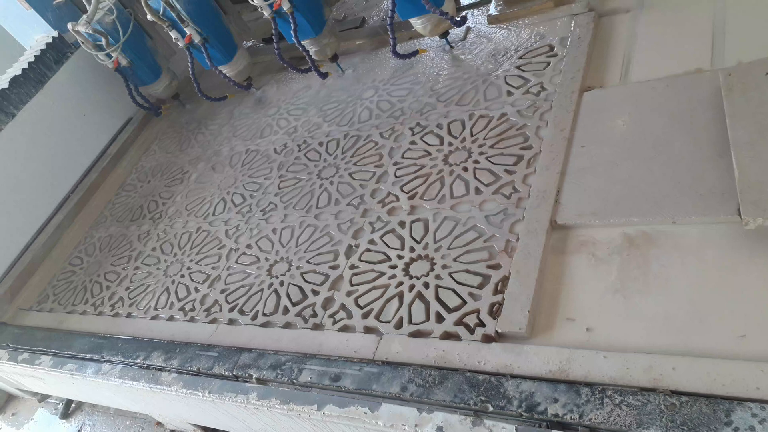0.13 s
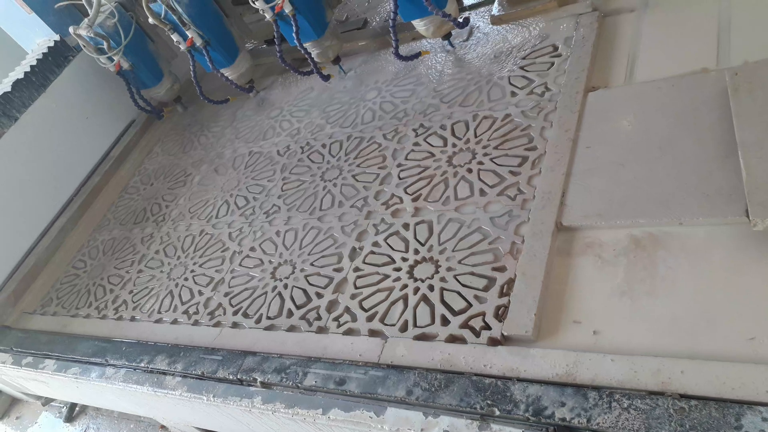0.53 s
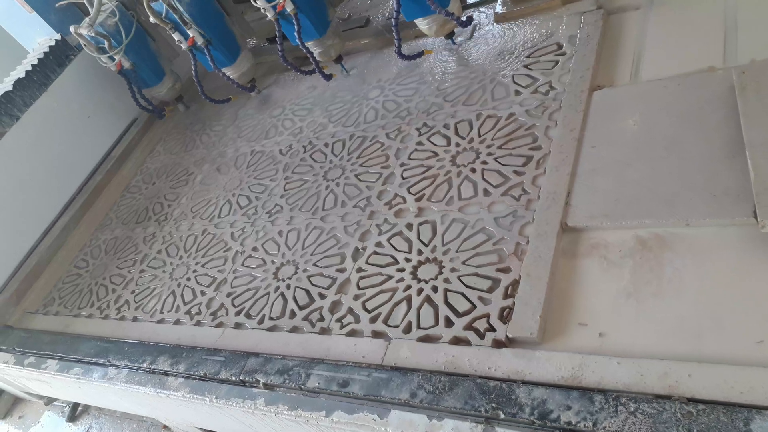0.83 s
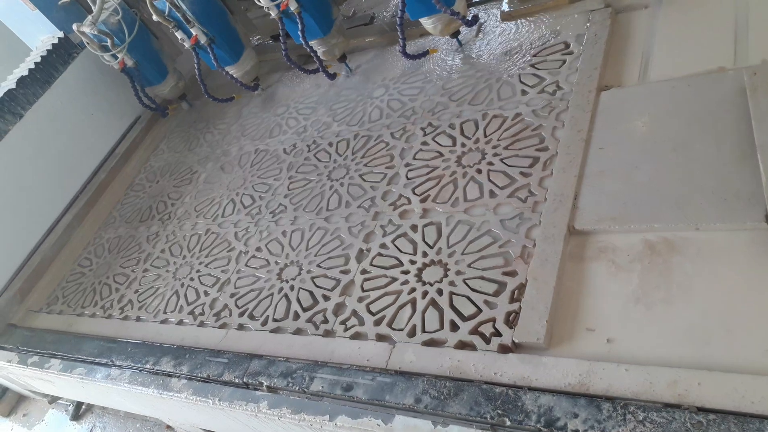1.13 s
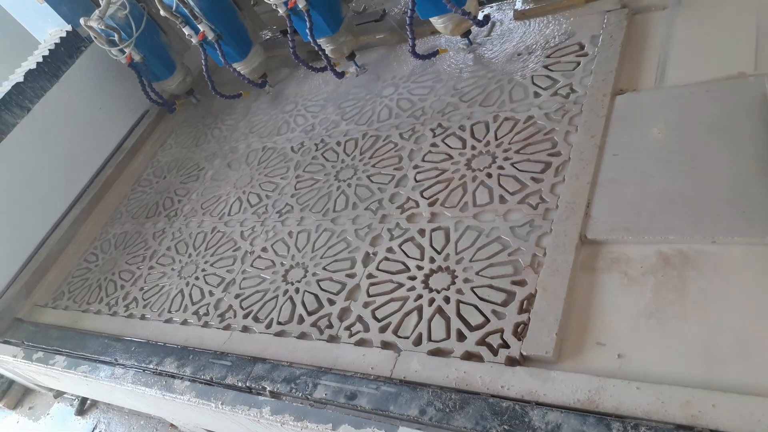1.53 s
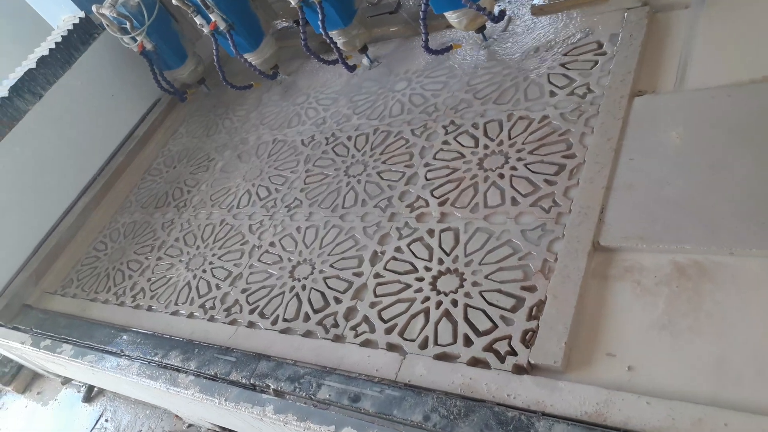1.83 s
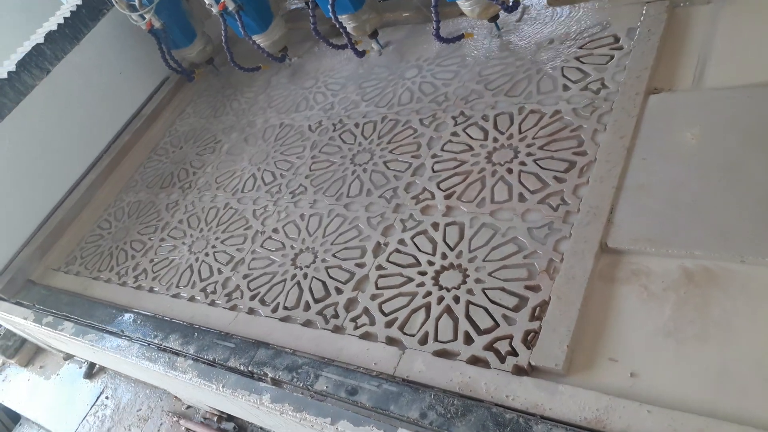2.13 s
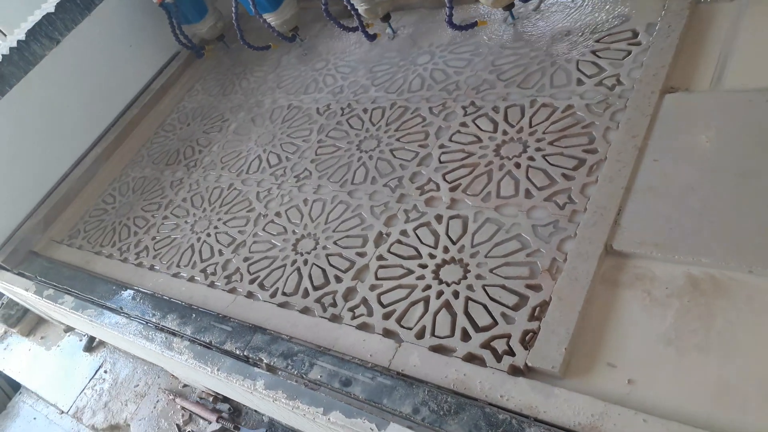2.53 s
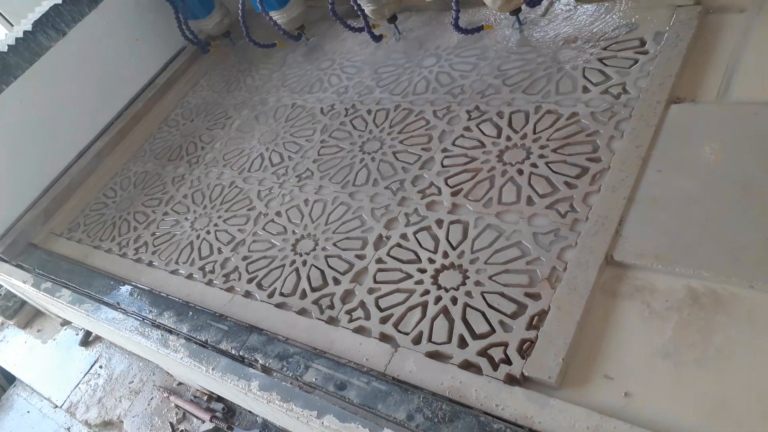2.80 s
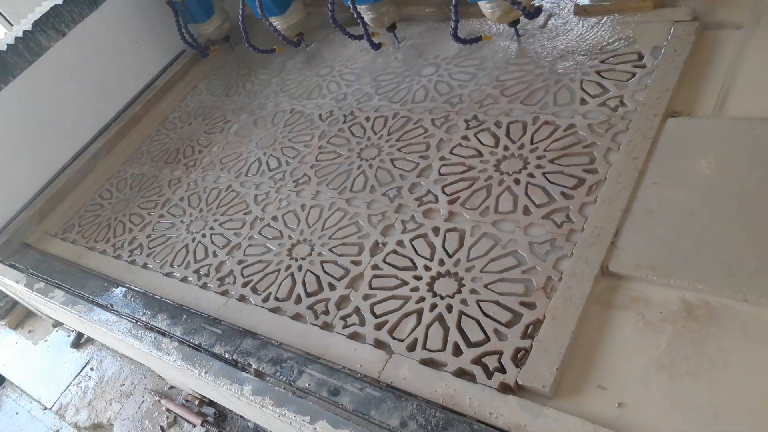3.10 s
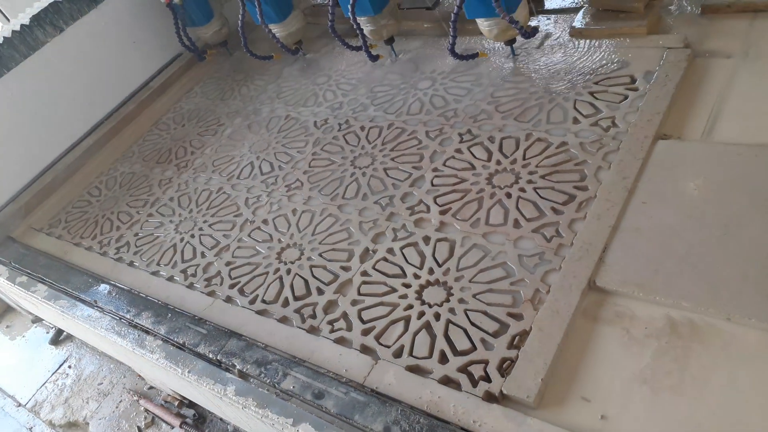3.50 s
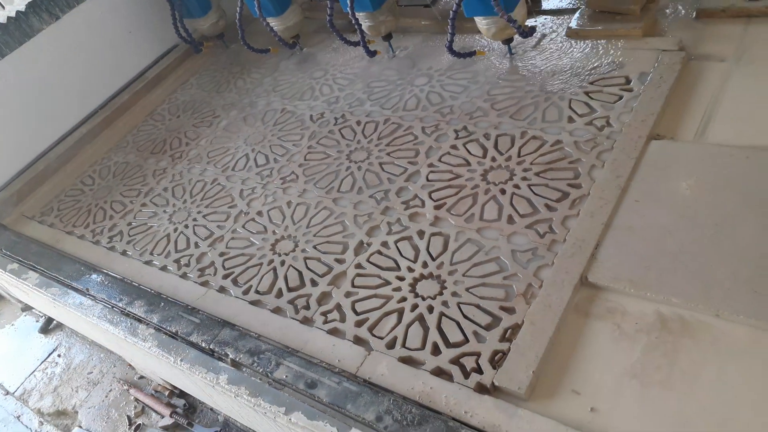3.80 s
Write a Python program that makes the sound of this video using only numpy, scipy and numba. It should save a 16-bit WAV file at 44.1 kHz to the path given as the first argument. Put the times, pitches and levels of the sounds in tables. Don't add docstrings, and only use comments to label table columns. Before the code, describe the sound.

Loud carving spindles grind patterned stone throughout, their buzz sagging slightly under load and easing near the end. Steady hum, shrill bearing whine and spray hiss surround them, heard close by phone in a reverberant workshop.

```python
import sys
import numpy as np
from scipy import signal
from scipy.fft import rfft, irfft
from scipy.io import wavfile
from scipy.ndimage import uniform_filter1d
from numba import njit

SR = 44100
rng = np.random.default_rng(int(sys.argv[2]) if len(sys.argv) > 2 else 0)


def output_pcm(signal):
    pcm = np.clip(np.atleast_2d(signal).T, -1, 1) * 32767
    wavfile.write(sys.argv[1], SR, np.round(pcm).astype(np.int16))


def attenuation_scalar(level_db):
    decades = np.asarray(level_db, float) / 20
    return 10 ** decades


N = 174195

# pitch_hz, level_db
HALL_COLOUR = [(20, -30), (45, -21), (90, -13), (130, -6.5), (300, 3.5), (580, 0), (1000, 3.5), (3000, -23)]
# start_s, pitch_hz, level_db
FEED_MOTOR = [
    (0, 64, -49),
    (.45, 58.05, -53),
    (.7, 58.6, -50),
    (1.1, 68.2, -47),
    (1.3, 76.4, -55),
    (1.8, 77, -57),
    (2.3, 65, -65),
    (3.95, 58.7, -63),
]
# pitch_hz, level_db
FAN_TONES = [
    (167, -52.5),
    (299, -42),
]
# pitch_hz, level_db
SPRAY_COLOUR = [(5000, -30), (7500, 5), (8600, -25), (9600, -21), (12000, -4.5), (14000, -5), (15050, 1),
                (15800, -3)]
# start_s, level_db
SPRAY_FLOW = [(0.1, -34), (0.13, -28), (0.17, -32), (0.9, -32), (0.93, -31), (1.18, -35), (1.22, -32),
              (2.11, -33.5), (2.45, -38), (3.19, -35), (3.4, -26), (3.51, -29), (3.56, -46), (3.94, -46)]
# start_s, pitch_hz (nominal), level_db
PUMP_HUM = [(0.1, 250.0, -11), (0.85, 250.0, -12.5), (1.32, 250.0, -12), (1.86, 250.0, -13.5),
            (1.99, 250.0, -12), (3.02, 250.0, -11), (3.8, 249.9, -12), (3.89, 248.1, -16),
            (3.94, 248.3, -28)]
# multiple, level_db (under the hum)
PUMP_OVERTONES = [(2, -27), (3, -21), (4, -30), (5, -34), (7, -25), (17, -32), (18, -29), (19, -29),
                  (20, -36), (22, -37), (23, -38)]
FREE_HEAD_HZ = [348.315, 350.26, 351.45]
FREE_HEAD_DB = [-24, -27, -32.5]
# multiple, head_1_db, head_2_db, head_3_db
FREE_HEAD_ORDERS = [(1.997, -36, -39.5, -38), (2.997, -41, -30.5, -38), (4, -34, -42, -44),
                    (5.028, -47, -39.5, -53), (5.973, -45, -42, -40), (12, -51, -53, -44),
                    (34.1, -63, -66, -57), (35, -70, -68, -58), (43, -68, -68, -49), (44, -72, -68, -63)]
# start_s, level_db
MIDDLE_HEAD_AIM = [
    (.1, 10),
    (.5, 6),
    (.75, 9),
    (1.15, 4),
    (1.35, 9.5),
    (1.65, -1),
    (1.9, 7.5),
    (2.25, -11),
    (3.95, -4),
]
# start_s, level_db
STANDING_WAVES = [(.1, 0.5), (.6, -1.5), (1.2, 0), (1.47, -6.5), (1.8, 0), (2.3, -1.5), (2.8, 0),
                  (3.3, -0.1), (3.95, -1)]
# start_s, level_db
BEARING_WHINE = [(0.1, -23), (0.8, -21.5), (0.86, -19), (1.62, -21), (1.74, -26.5), (2.07, -15.5),
                 (2.41, -26.5), (2.62, -21), (3.34, -24), (3.41, -31), (3.45, -26), (3.94, -20)]
# centre_s, length_s, pitch_hz, level_db
TOOL_WHISTLES = [(1.3, .5, 1340, -30), (2.1, .3, 985, -29), (.35, .3, 702, -27), (2.65, .4, 700, -27),
                 (1.3, .3, 1393, -30), (.31, .3, 2018, -25), (.8, .25, 2007, -27), (1.55, .6, 2042, -27),
                 (2.15, .6, 2030, -24), (2.8, .7, 2018, -23), (3.32, .25, 2060, -28), (.78, .7, 2102, -24),
                 (.38, .4, 2370, -26), (1.4, .7, 2388, -25), (2.5, .5, 2374, -30), (.45, .2, 2705, -26),
                 (1.13, .4, 2731, -29), (2.0, .3, 2738, -29), (3.04, .3, 2725, -23), (.4, .45, 3078, -23),
                 (1.17, .5, 3088, -22), (3.45, .2, 3135, -25), (3.4, .2, 3490, -22), (3.17, .15, 3773, -27),
                 (3.4, .15, 3835, -25), (.28, .35, 4745, -28), (.6, .4, 4760, -30), (.11, .18, 5860, -29),
                 (2.15, .3, 700, -28)]
# slip_hz (at full load), level_db
LOADED_HEADS = [
    (4.5, -2),
    (8.5, -2),
    (11.5, -1),
    (15, 0),
]
# start_s, share (of full load)
TOOL_LOAD = [
    (0, 0.52),
    (.4, 1.14),
    (1.2, 0.95),
    (2.1, 0.94),
    (2.5, 1.23),
    (3.0, 1.1),
    (3.35, 0.49),
    (3.95, 0.43),
]
# start_s, level_db
CUT_LEVEL = [(0.1, -12), (0.26, -14), (0.36, -13), (0.62, -13.5), (0.87, -13), (1.81, -15), (2.09, -13.5),
             (2.38, -17.5), (3.06, -14), (3.08, -14.5), (3.38, -12), (3.39, -11.5), (3.53, -15),
             (3.54, -19), (3.93, -18), (3.94, -16)]
# pitch_hz, level_db
GRIT_COLOUR = [(250, -33), (600, -14.5), (1000, -3.5), (2000, -3.5), (3600, 0), (5200, -8), (7000, -13.5),
               (9000, -45)]

NO_LOAD_HZ = 351
MARK_REPEAT = 0.88


def curve(table, col=1):
    table = np.array(table, float)
    return np.interp(np.arange(N) / SR, table[:, 0], table[:, col])


def unit(x):
    return x / np.sqrt(np.mean(x ** 2))


def colour(x, table):
    table = np.array(table, float)
    hz = np.arange(1, N // 2 + 2) * SR / N
    level_db = np.interp(np.log(hz), np.log(table[:, 0]), table[:, 1])
    return unit(irfft(rfft(x) * attenuation_scalar(level_db), N))


def walk(rate):
    hold = int(SR / rate)
    steps = np.repeat(rng.standard_normal(N // hold + 1), hold)
    slewed = uniform_filter1d(uniform_filter1d(steps, hold), hold)
    return 1.34 * slewed[:N]


def tone(turns):
    return np.sqrt(2) * np.cos(2 * np.pi * turns)


def treble(x):
    return unit(np.diff(np.diff(x, prepend=0), prepend=0))


@njit
def rerun(x, lag, repeat):
    y = x.copy()
    for i in range(200, len(x)):
        k = int(lag[i])
        part = lag[i] - k
        y[i] += repeat * ((1 - part) * y[i - k] + part * y[i - k - 1])
    return y


def echoes(x):
    decay_s, scatter_db = 0.03, -2.5
    t = np.arange(int(3 * decay_s * SR)) / SR
    tail = rng.standard_normal(len(t)) * np.exp(-t / decay_s)
    tail = tail / np.sqrt(np.sum(tail ** 2))
    return x + attenuation_scalar(scatter_db) * signal.fftconvolve(x, tail)[:N]


def hall():
    return attenuation_scalar(-27.5 + 1.9 * walk(1.76)) * colour(rng.standard_normal(N), HALL_COLOUR)


def feed_motor():
    turns = np.cumsum(curve(FEED_MOTOR) + 3.1 * walk(7)) / SR
    level_db = curve(FEED_MOTOR, col=2)
    first = attenuation_scalar(level_db + 3 * walk(9)) * tone(turns)
    octave = attenuation_scalar(level_db - 3 + 4.3 * walk(10.3)) * tone(2 * turns)
    return first + octave


def fans():
    t = np.arange(N) / SR
    return sum(attenuation_scalar(db + 3 * walk(3.84)) * tone(hz * t) for hz, db in FAN_TONES)


def spray():
    thrown_db, thrower_slip_hz = -2, 6
    puffs = attenuation_scalar(0.6 * walk(14) + 1.0 * walk(300)) * rng.standard_normal(N)
    turn_samples = SR / (NO_LOAD_HZ - thrower_slip_hz * curve(TOOL_LOAD))
    thrown = rerun(rng.standard_normal(N), turn_samples, MARK_REPEAT)
    hiss = treble(puffs) + attenuation_scalar(thrown_db) * treble(thrown)
    return attenuation_scalar(curve(SPRAY_FLOW) + 2.0) * colour(hiss, SPRAY_COLOUR)


def pump():
    turns = 249.86 * np.arange(N) / SR
    overtones = 0
    for multiple, db in PUMP_OVERTONES:
        overtones = overtones + attenuation_scalar(db + 2 * walk(2)) * tone(multiple * turns + rng.random())
    return attenuation_scalar(curve(PUMP_HUM, col=2)) * (tone(turns) + overtones)


def free_heads():
    in_step_s = 0.226
    t, out = np.arange(N) / SR - in_step_s, 0
    for head, hz in enumerate(FREE_HEAD_HZ):
        out = out + attenuation_scalar(FREE_HEAD_DB[head] + curve(STANDING_WAVES)) * tone(hz * t)
        turns = hz * t + np.cumsum(0.246 * walk(3)) / SR
        aim_db = curve(MIDDLE_HEAD_AIM) if head == 1 else 0
        for multiple, *db in FREE_HEAD_ORDERS:
            level_db = db[head] + aim_db + 2.15 * walk(5.8)
            out = out + attenuation_scalar(level_db) * tone(round(multiple) * turns + rng.random())
    return out


def bearing():
    turns = 3517.4 * np.arange(N) / SR + np.cumsum(0.64 * walk(4.07)) / SR
    return attenuation_scalar(curve(BEARING_WHINE) - 2.35) * tone(turns)


def tool_whistles():
    wobble_depth, flutter_db = 0.001487, 2.5
    t, out = np.arange(N) / SR, 0
    wobble, flutter = np.cumsum(walk(9)) / SR, walk(21.91)
    for k, (centre_s, length_s, hz, db) in enumerate(TOOL_WHISTLES):
        place = np.clip((t - centre_s) / (0.69 * length_s), -1, 1)
        swell = np.cos(np.pi / 2 * place) ** 1.5
        turns = hz * (t + wobble_depth * np.roll(wobble, 5003 * k))
        level_db = db + flutter_db * np.roll(flutter, k * N // len(TOOL_WHISTLES))
        out = out + attenuation_scalar(level_db) * swell * tone(turns)
    return out


def cutting():
    slip_wander_hz, head_swell_db, loose_grit_db = 0.84, 2.5, -1.5
    out = 0
    for slip_hz, db in LOADED_HEADS:
        hz = NO_LOAD_HZ - slip_hz * curve(TOOL_LOAD) + slip_wander_hz * walk(2.97)
        grit = rerun(rng.standard_normal(N), SR / hz, MARK_REPEAT)
        out = out + echoes(attenuation_scalar(db + head_swell_db * walk(6.06)) * grit)
    out = unit(out) + attenuation_scalar(loose_grit_db) * rng.standard_normal(N)
    return attenuation_scalar(curve(CUT_LEVEL) - 2.5) * colour(out, GRIT_COLOUR)


def scene():
    background = hall() + feed_motor() + fans() + spray() + pump()
    spindles = free_heads() + bearing() + tool_whistles() + cutting()
    return (background + spindles)[None]


def low_pass(x):
    return signal.sosfilt(signal.butter(12, 16950, fs=SR, output="sos"), x)


def record(dry):
    start_s, fade_s, top_hz = 0.0697, 0.00035, 15730
    opening = np.clip((np.arange(N) / SR - start_s) / fade_s, 0, 1)
    mix = np.clip(dry, -0.96, 0.96) * opening
    mix = signal.sosfilt(signal.ellip(16, 0.3, 75, top_hz, fs=SR, output="sos"), mix)
    return low_pass(mix)


dry = scene()
out = record(dry)
output_pcm(out)
```